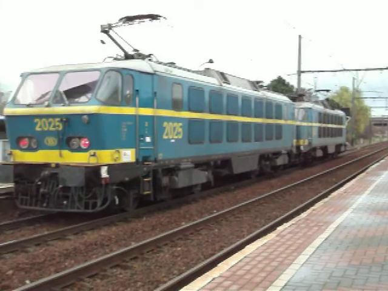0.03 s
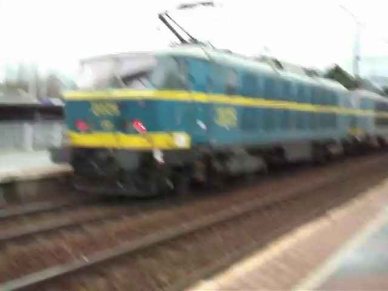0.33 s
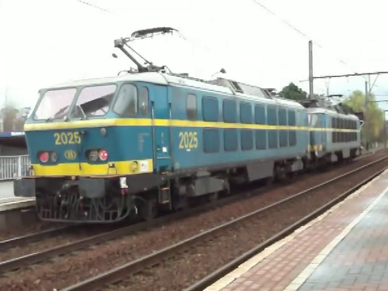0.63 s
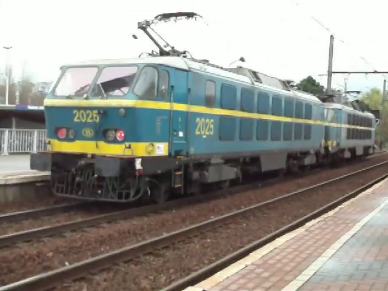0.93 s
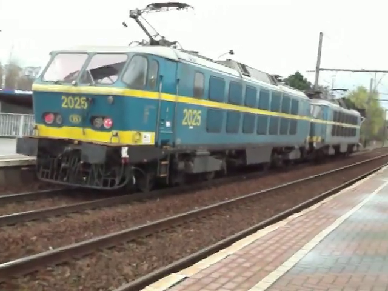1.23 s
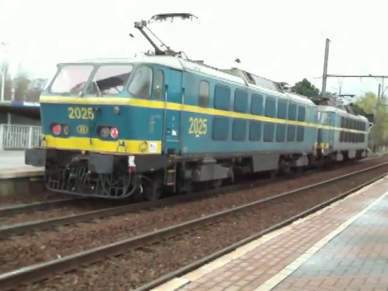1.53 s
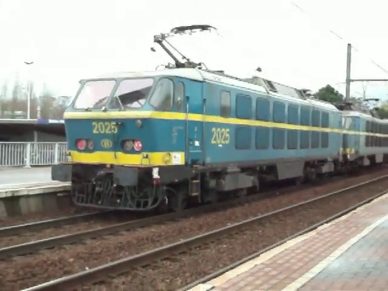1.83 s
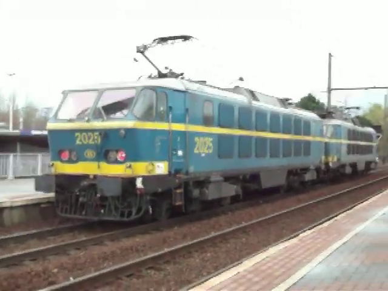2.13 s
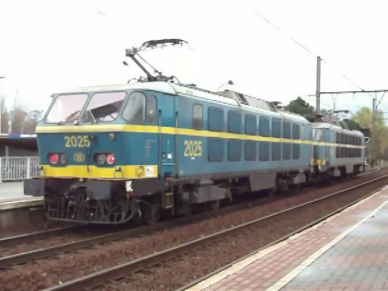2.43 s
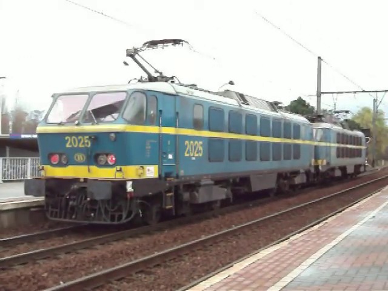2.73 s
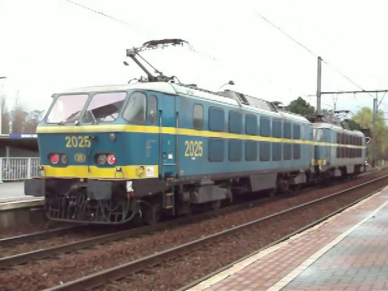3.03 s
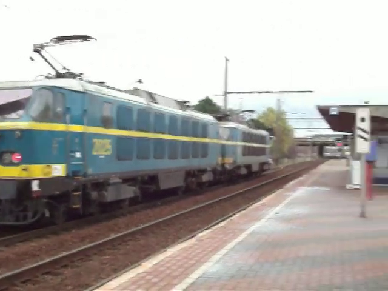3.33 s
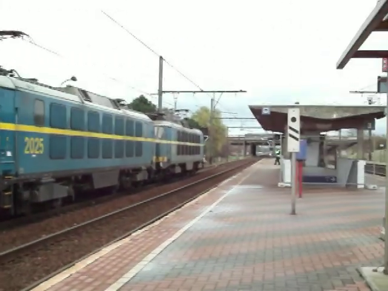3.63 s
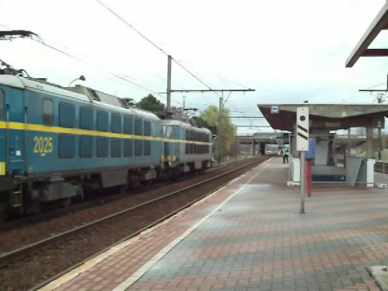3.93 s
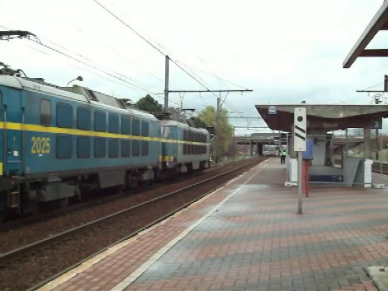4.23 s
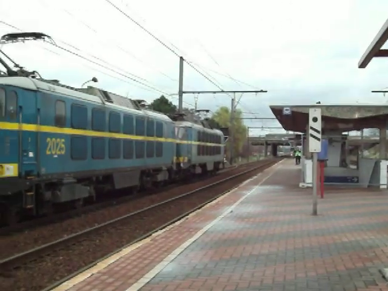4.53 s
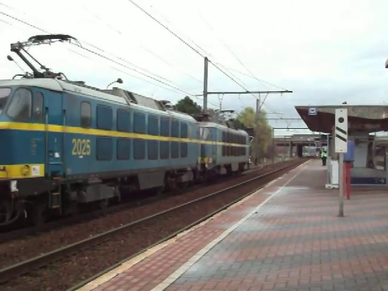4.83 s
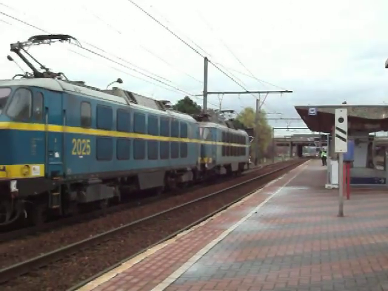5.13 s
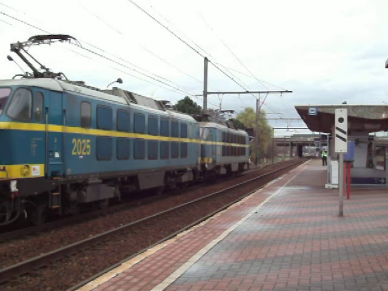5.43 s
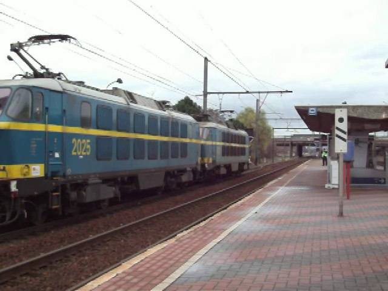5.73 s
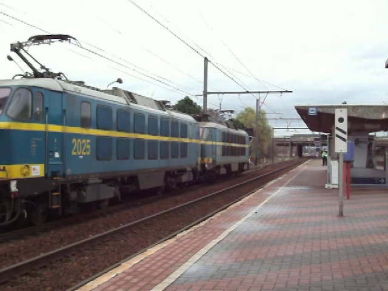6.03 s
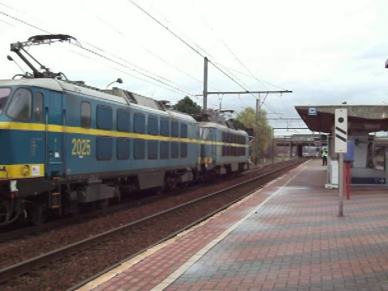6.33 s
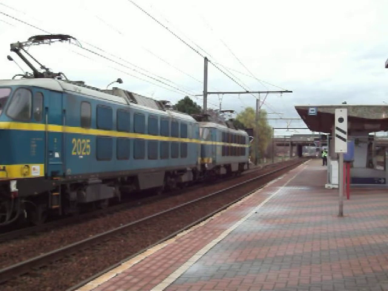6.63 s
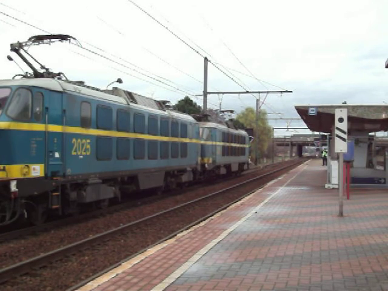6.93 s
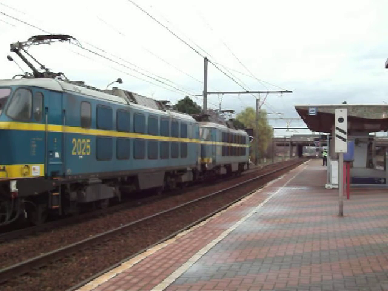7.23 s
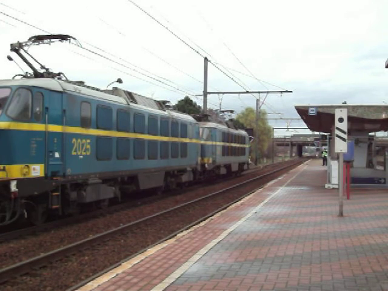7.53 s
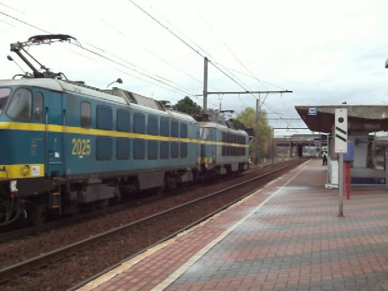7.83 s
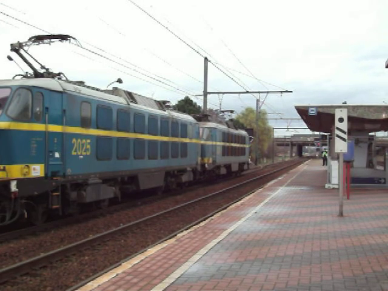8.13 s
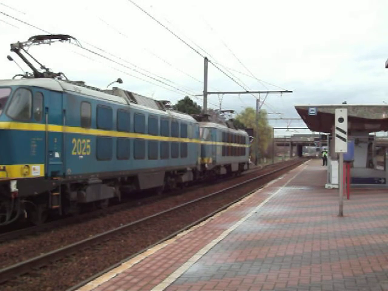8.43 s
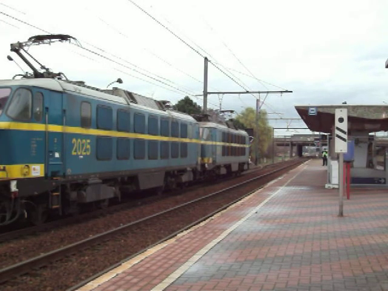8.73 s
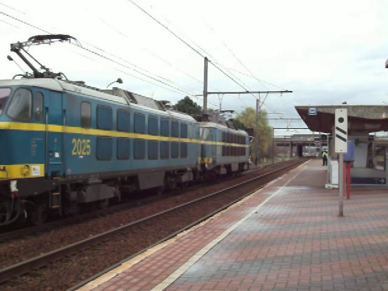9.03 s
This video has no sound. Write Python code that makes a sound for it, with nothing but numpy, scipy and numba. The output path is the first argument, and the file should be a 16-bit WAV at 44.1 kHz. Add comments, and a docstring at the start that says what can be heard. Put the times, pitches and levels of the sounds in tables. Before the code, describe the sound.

Handling knocks and dull bumps over the steady fan hum of a standing electric locomotive, with light wind on the microphone.

```python
"""A parked electric locomotive runs its cooling fans by a platform: a steady roar, faint tones, a thin whine.
A breeze rumbles on the microphone of a small hand-held camera. For the first two seconds or so, fingers
knock, scrape and tap on the case; the camera's input ducks and clips on the hardest knocks.
Then the palm rubs and bumps now and then. Past halfway the fans swell once and the whine settles.
Near the end the palm shifts its grip again, with its loudest bumps."""
import sys
import numpy as np
from scipy import signal
from scipy.fft import rfft, irfft
from scipy.io import wavfile
from scipy.ndimage import uniform_filter1d
from numba import njit

SR = 44100
rng = np.random.default_rng(int(sys.argv[2]) if len(sys.argv) > 2 else 0)


def bounce(signal):
    """Save signal as a 16-bit WAV file at the path given by the first command-line argument."""
    frames = np.transpose(np.atleast_2d(signal))
    limited = np.clip(frames, -1, 1)
    pcm = np.round(limited * 32767).astype(np.int16)
    wavfile.write(sys.argv[1], SR, pcm)


N = 401310
TIME = np.arange(N) / SR


def gain(db):
    """Turn decibels into a number to multiply by."""
    return 10 ** (np.asarray(db) / 20)


def unit(x):
    """Scale a signal to an average strength (rms) of 1."""
    return x / np.sqrt(np.mean(x ** 2))


def curve(rows):
    """Join (time_s, value) points with straight lines."""
    return np.interp(TIME, *np.transpose(rows))


def wander(rate_hz):
    """A smooth random wobble of size about 1, changing about rate_hz times a second."""
    hold = int(SR / rate_hz)
    steps = np.repeat(rng.standard_normal(N // hold + 1), hold)[:N]
    return unit(uniform_filter1d(uniform_filter1d(steps, hold), hold))


def swell(start_s, length_s, rise_s, fade_s):
    """The loudness of one gust or hand movement: rise, hold, die away."""
    t = TIME - start_s
    return np.clip(t / rise_s, 0, 1) * np.exp(-np.clip((t - length_s) / fade_s, 0, 20))


def lowpass(x, hz, order=2):
    """Turn down everything above hz; a higher order cuts more sharply."""
    return signal.sosfilt(signal.butter(order, hz, fs=SR, output="sos"), x)


# How strong the fans' roar is at each pitch, low part and high part: pitch_hz, relative_db
ROAR_LOW = [(40, -9.5), (75, -7.5), (120, -3), (140, -0.5), (170, -1.5), (210, 1), (255, -2.5), (370, 0),
            (420, -1.5), (470, 1), (560, -0.5), (650, -3.5)]
ROAR_HIGH = [(800, -2), (950, 2.5), (1100, 2), (1400, -6), (1650, -15), (2150, -15.5), (2800, -9.5),
             (3300, -16.5), (4000, -24), (4700, -28), (5400, -34), (6000, -43)]
# The rush of air around 1000 Hz, which swells once: time_s, gain_db
RUSH_LEVEL = [(0, -23.5), (2.6, -23), (4.2, -25.5), (5.3, -24.5), (5.6, -21), (6.05, -24), (6.5, -23.5),
              (9.1, -26)]

def fans(rumble_db=-21.5, hiss_db=-21.5, flutter_db=0.57, drift_db=0.57):
    """Air churns through ducts and vents. The whole roar drifts, and each octave flutters on its own."""
    log_hz = np.log(np.arange(N // 2 + 1) * SR / N + 1)
    pitch_hz, relative_db = np.transpose(ROAR_LOW + ROAR_HIGH)
    shape = gain(np.interp(log_hz, np.log(pitch_hz), relative_db))
    air = unit(irfft(rfft(rng.standard_normal(N)) * shape, N))
    spectrum = rfft(air)
    rush_db = curve(RUSH_LEVEL)
    high_db = hiss_db + 0.23 * (rush_db - rush_db.mean())  # the hiss follows the rush a little
    octaves_hz = [125, 250, 500, 1000, 2000, 4000]
    levels_db = [rumble_db, rumble_db, rumble_db, rush_db, high_db, high_db]
    out = 0
    for level_db, share in zip(levels_db, np.eye(len(octaves_hz))):
        band = irfft(spectrum * np.interp(log_hz, np.log(octaves_hz), share), N)
        out = out + band * gain(level_db + flutter_db * wander(9))
    return out * gain(drift_db * wander(2.9))


def tone(pitch_hz, level_db, wobble_hz, wobble_db):
    """A pure tone whose pitch and loudness wobble."""
    phase = 2 * np.pi * np.cumsum(pitch_hz + wobble_hz * wander(6)) / SR
    return np.sqrt(2) * np.sin(phase) * gain(level_db + wobble_db * wander(8))


# Tones of the fan blades and motors: pitch_hz, level_db, wobble_hz
FAN_TONES = [(141.4, -40, 4), (453.4, -41, 3), (467, -42, 3), (526.5, -48.5, 1.5), (719, -40, 3.5),
             (1917, -51.5, 5.4), (2770, -65, 6.7)]

def fan_hum():
    """Spinning blades and their motors add faint, unsteady tones."""
    return sum(tone(*row, wobble_db=2.2) for row in FAN_TONES)


# How far the whine's pitch strays: time_s, wobble_hz
WHINE_WOBBLE = [(0, 6.4), (2.5, 11.7), (4.6, 10.4), (5.5, 4), (6.4, .6), (9.1, 0.58)]

def whine():
    """A thin electrical whine wavers, then settles."""
    return tone(pitch_hz=4834, level_db=-54, wobble_hz=curve(WHINE_WOBBLE), wobble_db=.3)


# Gusts on the microphone: start_s, length_s, level_db
GUSTS = [(0.096, 0.46, -31.5), (1.346, .5, -29), (3.08, 0.36, -27.5), (4.1, 0.36, -33.5),
         (4.647, 0.11, -22.5), (5.348, 0.1, -33.5), (6.22, .34, -33.5), (8.38, 0.38, -31.5)]

def breeze(band_hz=(5, 55), buffet_db=1):
    """Slow swirls of air press on the microphone: light air all the time, with gusts on top."""
    deep_band = signal.butter(1, band_hz, "bandpass", fs=SR, output="sos")
    swirls = unit(lowpass(signal.sosfilt(deep_band, rng.standard_normal(N)), 170))
    gusts = sum(gain(db) * swell(s, length_s, rise_s=0.05, fade_s=0.034) for s, length_s, db in GUSTS)
    light_air = gain(-34 - 0.53 * TIME)  # slowly dies down
    return swirls * np.hypot(light_air, gusts) * gain(buffet_db * wander(12))


def ring(force, modes):
    """Shake an object's modes, the pitches it likes to ring at. Neighbours swing opposite ways."""
    out = 0
    for k, (pitch_hz, width_hz, level_db) in enumerate(modes):
        b, a = signal.iirpeak(pitch_hz, pitch_hz / width_hz, fs=SR)
        ringing = signal.lfilter(b, a, signal.lfilter(b, a, force))  # twice, for a steeper peak
        out = out + (-1) ** k * gain(level_db) * ringing
    return out


def strike(out, time_s, level_db, slip_s, parts):
    """Add to out a gritty slip with a blow at its peak, ringing each (modes, part_db, grit) part."""
    t = TIME[:SR // 10]
    blow_at = int(slip_s * SR)
    blow = signal.unit_impulse(len(t), blow_at)
    slip = rng.standard_normal(len(t)) * t / slip_s * np.exp(1 - t / slip_s)
    start = int(time_s * SR) - blow_at
    for modes, part_db, grit in parts:
        sound = ring(blow + grit * slip, modes)
        loudest = np.sqrt(uniform_filter1d(sound ** 2, SR // 330).max())  # over 3 ms
        out[start:start + len(t)] += gain(level_db + part_db) * sound / loudest


CASE_GRIT, NAIL_GRIT = 0.15, 0.082  # how much slip noise goes into the case and the nail's click
# The camera case's low thud, hollow ring and plastic click: pitch_hz, width_hz, level_db
THUD_MODES = [(93, 41, -11.5), (209, 140, -8.5), (356, 168, -3.5), (527, 153, -2)]
RING_MODES = [(679, 177, -1), (865, 120, 3), (1059, 180, -1)]
CLICK_MODES = [(1693, 470, 2), (2290, 620, -2), (2806, 550, 1), (4060, 1650, -15.5)]
SHOVED_MIC, LOOSE_PLASTIC = [(87, 190, 0)], [(4620, 1070, 0)]  # same columns
# Finger knocks: time_s, ring_db, thud_db, click_db (thud and click are relative to the ring)
KNOCKS = [(.367, -8.5, -7.5, -7.5), (.401, -7, 4, -7), (.438, -7.5, -4.5, -14.5), (.464, -17.5, -2, -4),
          (.544, -13, -3, -13.5), (.598, -21.5, -11.5, -3), (1.156, -9.5, -12.5, -20),
          (1.719, -15, -2, -5.5), (1.885, -8, -11, -13.5), (1.899, -16, -13.5, -4), (2.007, -3, 0.5, -8.5),
          (2.062, -15, -11, -14.5), (2.097, -10, -3, -8.5), (2.14, -11.5, -6.5, -12.5),
          (2.168, -5, 1.5, -6), (2.224, -9, -13, -6.5), (2.272, -10.5, -17.5, -19.5),
          (2.294, -2.5, -1.5, -6), (2.343, -11, -8.5, 0), (6.279, -21, -0.5, -13)]

def knocks(hard_db=-7.5, rebound_s=0.0084):
    """Flesh thuds and the nail clicks. After a hard knock the case snaps back, lighter and brighter."""
    blows = [(*row, -12.5) for row in KNOCKS]  # added column: loose_db, relative to the click
    blows += [(s + rebound_s, db - 3.5, -6.5, -3.5, -4.5) for s, db, *_ in KNOCKS if db > hard_db]
    out = np.zeros(N)
    for time_s, ring_db, thud_db, click_db, loose_db in blows:
        slip_s = .0022 * .5 ** (thud_db / 24.5 + click_db / 19.5)  # more thud or click, shorter slip
        parts = [(SHOVED_MIC, thud_db - 11.5, CASE_GRIT),
                 (THUD_MODES, thud_db, CASE_GRIT),
                 (RING_MODES, 0, CASE_GRIT),
                 (CLICK_MODES, click_db, NAIL_GRIT),
                 (LOOSE_PLASTIC, click_db + loose_db, NAIL_GRIT)]
        strike(out, time_s, ring_db, slip_s, parts)
    return out


def slips(per_second, scatter_db):
    """Skin sticks and slips: tiny jerks of uneven size at random moments."""
    jerks = (rng.random(N) < per_second / SR) * rng.choice([-1, 1], N)
    return jerks * gain(scatter_db * np.clip(rng.standard_normal(N), -2, 2))


# Fingers sliding over the case: start_s, length_s, level_db, thud_db (relative to the ring)
SCRAPES = [(.372, .08, -24, -15), (0.504, 0.079, -22, -9), (1.148, 0.057, -22.5, -5.5),
           (1.488, 0.11, -23.5, -5), (1.712, 0.033, -19, -7), (1.812, 0.15, -25.5, -8),
           (2.06, .02, -22, -2), (2.2, 0.18, -27.5, 1)]

def scrapes(click_db=-18, tick_db=-11):
    """Fingertips judder across the case and keep it ringing; now and then the plastic ticks."""
    judder = slips(per_second=1100, scatter_db=3)
    catches = slips(per_second=130, scatter_db=1.5)
    hollow = unit(ring(judder, RING_MODES))
    thud = unit(ring(judder, THUD_MODES))
    clicks = gain(click_db) * unit(ring(judder, CLICK_MODES))
    ticks = gain(tick_db) * unit(ring(catches, CLICK_MODES[:2]))
    out = 0
    for start_s, length_s, level_db, thud_db in SCRAPES:
        body = (hollow + gain(thud_db) * thud) / np.hypot(1, gain(thud_db))
        pressure = gain(level_db) * swell(start_s, length_s, rise_s=0.0093, fade_s=.04)
        out = out + (body + clicks + ticks) * pressure
    return out


AIR_IN_CASE = [(355, 91, 0)]  # pitch_hz, width_hz, level_db
# Soft fingertip taps: time_s, level_db
TAPS = [(.493, -19), (1.487, -11.5), (1.521, -19.5), (1.548, -11), (1.644, -17), (1.759, -21), (1.832, -18)]

def taps(thud_db=-5.5, ring_db=-3.5, click_db=-18):
    """The pad of a finger lands softly and the air in the hollow case booms."""
    mix = [(AIR_IN_CASE, 0), (THUD_MODES, thud_db), (RING_MODES, ring_db), (CLICK_MODES, click_db)]
    parts = [(modes, part_db, CASE_GRIT) for modes, part_db in mix]
    out = np.zeros(N)
    for time_s, level_db in TAPS:
        strike(out, time_s, level_db, slip_s=.002, parts=parts)
    return out


# How the case rings under a soft hand: pitch_hz, width_hz, level_db
HELD_CASE_MODES = [(159, 174, -1.5), (340, 270, -3.5), (550, 650, -10.5)]
# The palm shifting its grip: start_s, length_s, level_db
RUBS = [(1.75, 0.68, -29.5), (4.31, 0.25, -28), (4.683, 0.11, -28.5), (6.215, .2, -28), (8.3, .075, -16),
        (8.444, 0.17, -22), (8.617, 0.19, -20), (8.932, 0.2, -23.5)]
# Soft bumps of the palm: time_s, peak_db
BUMPS = [(4.404, -8.5), (4.436, -7), (4.522, -7), (8.346, -7), (8.372, -3), (8.417, -6), (8.425, 0.5),
         (8.465, -11), (8.512, -4)]

def palm(muffle_hz=1100, uneven_db=2):
    """The palm's skin creeps unevenly over the case and lets go in short, dull bumps."""
    def held_case(force):
        return lowpass(ring(force, HELD_CASE_MODES), muffle_hz)

    creep = unit(held_case(slips(per_second=750, scatter_db=2)))
    pressure = sum(gain(db) * swell(s, length_s, rise_s=0.02, fade_s=0.024) for s, length_s, db in RUBS)
    rubs = creep * pressure * gain(uneven_db * wander(40))
    blows = np.zeros(N)
    for time_s, peak_db in BUMPS:
        blows[int(time_s * SR)] = gain(peak_db)
    one_bump_peak = np.abs(held_case(signal.unit_impulse(SR))).max()
    return rubs + held_case(blows) / one_bump_peak


def scene():
    """The locomotive, the breeze and the hand on the camera, in one channel."""
    return (fans() + fan_hum() + whine() + breeze() + knocks() + scrapes() + taps() + palm())[None]


@njit
def follow_level(x, rise_s, fall_s):
    """Track how loud a signal is, rising and falling at different speeds."""
    out, level = np.empty(len(x)), 0.
    for i in range(len(x)):
        size = abs(x[i])
        level += (size - level) / (SR * (rise_s if size > level else fall_s))
        out[i] = level
    return out


def record(dry, duck_above=0.44, clip_at=.71, top_hz=5750):
    """The camera's input turns down after loud knocks, cuts the high treble and clips what is too big."""
    level = follow_level(dry[0], rise_s=.0004, fall_s=0.033)
    ducked = dry[0] / np.maximum(level / duck_above, 1)
    clipped = np.clip(lowpass(ducked, top_hz, order=30), -clip_at, clip_at)
    final_cut = signal.ellip(8, .2, 70, 16000, fs=SR, output="sos")  # trims the clipping's highest fizz
    return signal.sosfilt(final_cut, clipped)[None]


dry = scene()
out = record(dry)
bounce(out)
```